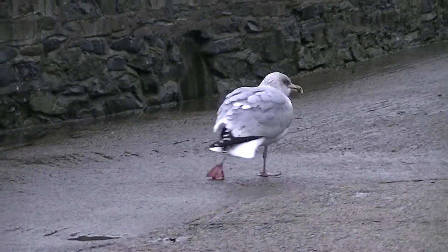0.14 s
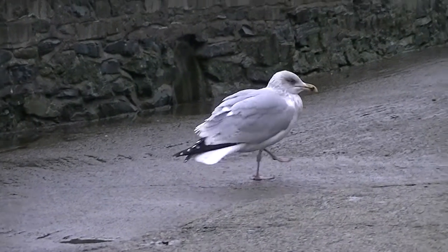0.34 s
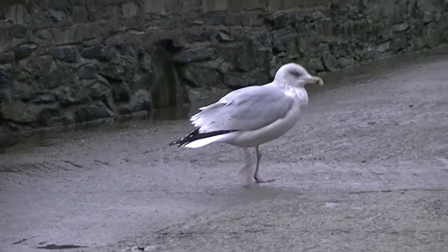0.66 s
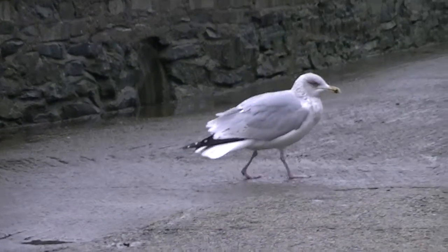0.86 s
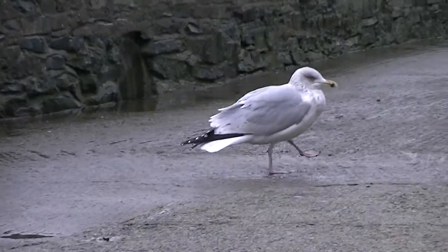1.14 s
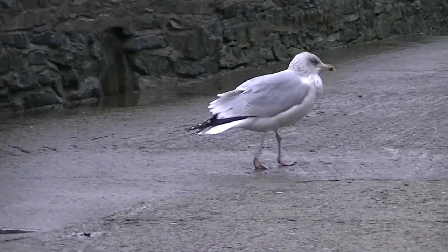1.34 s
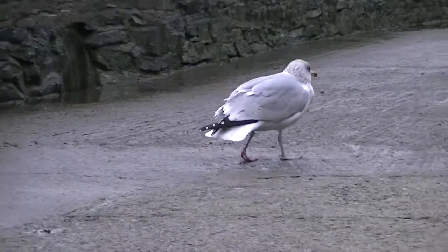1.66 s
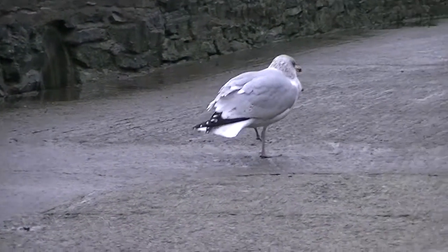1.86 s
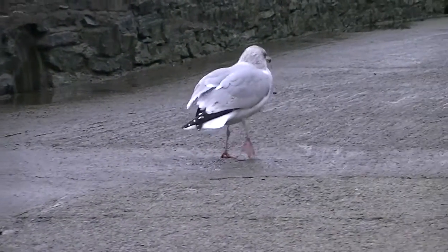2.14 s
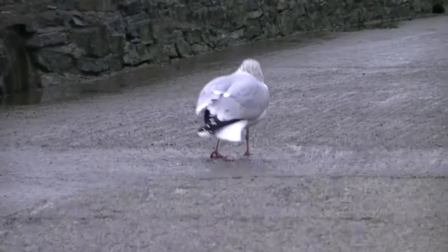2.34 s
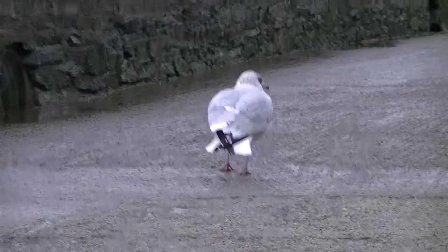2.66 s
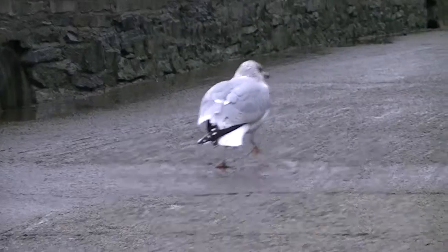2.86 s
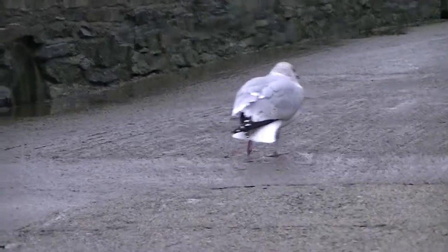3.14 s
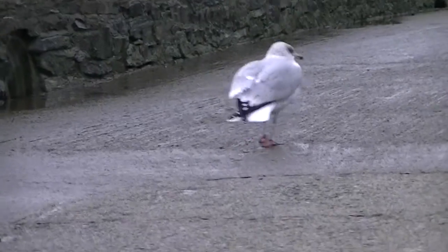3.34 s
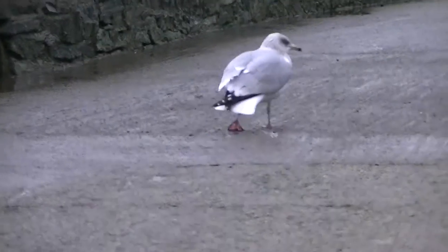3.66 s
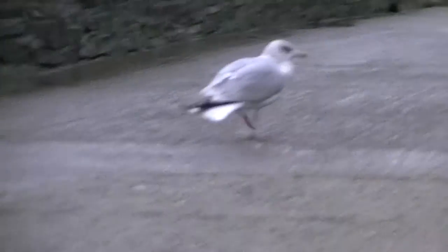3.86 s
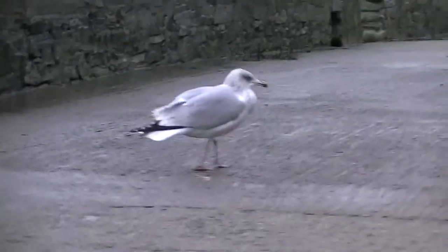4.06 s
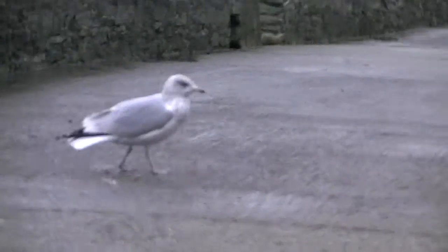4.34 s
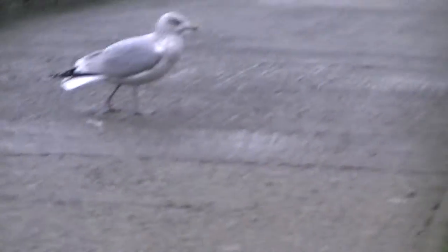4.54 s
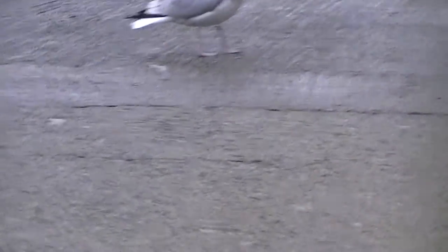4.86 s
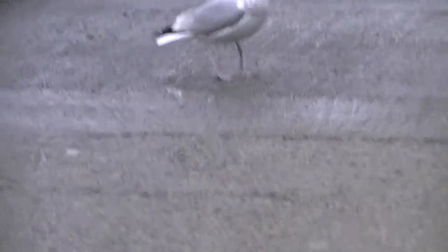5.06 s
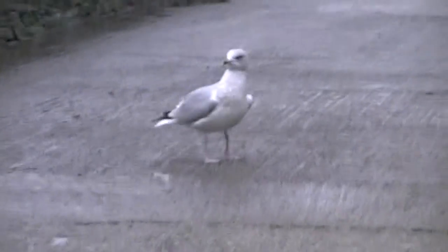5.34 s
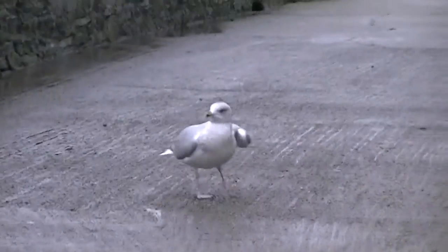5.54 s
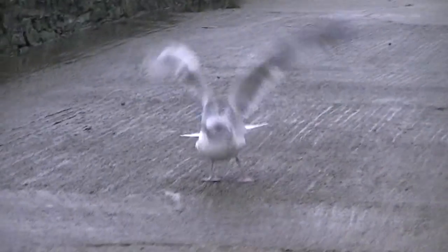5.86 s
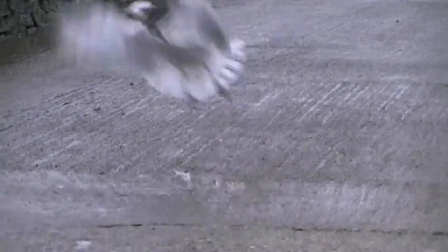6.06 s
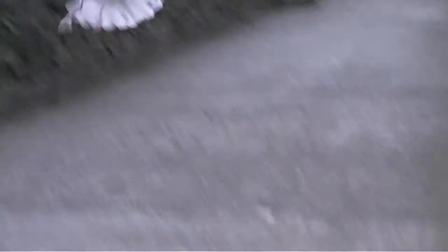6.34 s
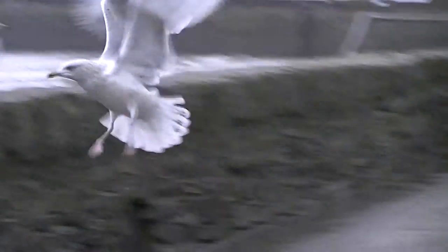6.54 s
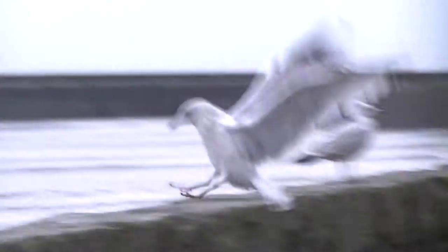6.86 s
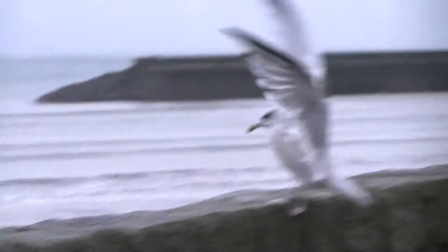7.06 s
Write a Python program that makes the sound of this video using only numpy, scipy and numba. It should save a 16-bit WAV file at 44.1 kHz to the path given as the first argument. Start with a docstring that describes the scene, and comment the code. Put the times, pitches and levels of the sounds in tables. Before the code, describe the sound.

Surf washes steadily at a harbour. Two hoarse seagull cries overlap at the start, and a louder one follows after a short pause. Later a wave rolls in with a hollow, tumbling roar as a fourth cry rings out. A single bubble plops, and a few faint ticks and distant bird peeps come through the water. The outdoor sound is nearly mono, with almost no echo.

```python
"""Harbour slipway: four hoarse gull cries, the first two overlapping, over steady surf.
A cry is a fast train of air bursts, each much like the last, ringing a throat that slides from
open to closing. Late on, a wave rolls in with a hollow roar and one large bubble; far peeps and
a few ticks are scattered about. A nearly mono microphone turns its gain down on loud sounds."""
import sys
import numpy as np
from scipy import signal
from scipy.fft import rfft, irfft
from scipy.io import wavfile
from scipy.ndimage import uniform_filter1d
from numba import njit

SR = 44100
rng = np.random.default_rng(int(sys.argv[2]) if len(sys.argv) > 2 else 0)


def output_pcm(signal):
    """Save a mono or channel-first signal as 16-bit PCM at the path in sys.argv[1].

    Samples are clipped to [-1, 1] before scaling.
    """
    pcm = np.clip(np.atleast_2d(signal).T, -1, 1) * 32767
    wavfile.write(sys.argv[1], SR, np.round(pcm).astype(np.int16))


N = 317520


def undb(db):
    return 10 ** (np.asarray(db) / 20)


def unit(x):
    return x / np.sqrt(np.mean(x ** 2))


def curve(table, t):
    """Table columns interpolated at times t."""
    times_s, *columns = np.transpose(table)
    return [np.interp(t, times_s, c) for c in columns]


def pan(x, db):
    """Mono to stereo; db is left minus right."""
    return np.array([x * undb(db / 2), x * undb(-db / 2)])


@njit
def svf(x, hz, width_hz):
    """State-variable band-pass, moving centre and width, gain 1 at the centre."""
    y, band, low = np.empty(len(x)), 0., 0.
    for i in range(len(x)):
        g, damping = np.tan(np.pi * hz[i] / SR), width_hz[i] / hz[i]
        v = (band + g * (x[i] - low)) / (1 + g * (g + damping))
        band, low, y[i] = 2 * v - band, low + 2 * g * v, damping * v
    return y


def bandpass(x, hz, width_hz):
    """Two band-passes in series."""
    hz, width_hz = hz + 0 * x, width_hz + 0 * x
    return svf(svf(x, hz, width_hz), hz, width_hz)


@njit
def repeating_noise(fresh, period_samples, carry):
    """Noise that recurs one period later, mixed with fresh noise."""
    y = fresh.copy()
    for i in range(len(y)):
        j = i - period_samples[i]
        if j >= 0:
            y[i] = carry * y[j] + np.sqrt(1 - carry * carry) * fresh[i]
    return y


def walk(rate_hz, count=N):
    """Random steps, smoothed twice; RMS 1."""
    hold = int(SR / rate_hz)
    steps = np.repeat(rng.standard_normal(count // hold + 1), hold)
    return unit(uniform_filter1d(uniform_filter1d(steps, hold), hold)[:count])


def coloured_noise(hz, db):
    """Noise with the given spectrum."""
    bins_hz = np.arange(1, N // 2 + 2) * SR / N
    gain = undb(np.interp(np.log(bins_hz), np.log(hz), db, right=-150))
    return irfft(rfft(rng.standard_normal(N)) * gain, N)


def stereo_noise(spectrum):
    """Common mid plus independent, mostly weaker side; RMS 1."""
    # stereo width: (frequency [Hz], side minus mid [dB])
    width = [(60, -5), (110, 2), (190, -23.5), (340, -24.5), (600, -29), (1060, -19), (1880, -17),
             (3330, -15.5), (5910, -13), (10500, -10.5)]
    width_hz, width_db = np.transpose(width)
    hz, db = np.transpose(spectrum)
    side_db = np.interp(np.log(hz), np.log(width_hz), width_db)
    mid, side = coloured_noise(hz, db), coloured_noise(hz, db + side_db)
    return unit(np.array([mid + side, mid - side]))


def surf():
    """Distant wash and spray, each swaying on its own, over faint microphone hiss."""
    # surf loudness: (time [s], wash [dB], spray [dB])
    levels = [(0, -34.5, -56), (1.2, -35, -50.5), (1.8, -36.5, -55.5), (2.3, -35.5, -53), (3.1, -35, -47),
              (3.6, -35, -45), (4.2, -34.5, -47), (4.7, -34, -45), (5.3, -31, -43), (6.1, -32.5, -42.5),
              (6.6, -32.5, -42.5), (7.2, -29.5, -41.5)]
    # wash noise: (frequency [Hz], relative density [dB])
    wash_spectrum = [(18, -86), (30, -43), (91, -58), (226, -13.5), (384, -9.5), (458, -4), (834, -1),
                     (974, 0.5), (1300, -2.5), (1660, -2), (2820, -12), (3090, -11.5), (3520, -17),
                     (6000, -32.5), (7800, -52), (13200, -120)]
    # spray noise: (frequency [Hz], relative density [dB])
    spray_spectrum = [(1470, -23), (2500, -1.5), (2660, -5), (2830, -2.5), (3050, -11), (3200, -3.5),
                      (5310, -9.5), (7510, -20.5), (10900, -39.5), (14200, -66), (22000, -120)]
    wash_db, spray_db = curve(levels, np.arange(N) / SR)
    sway_db = .3 * walk(3) + .5 * walk(14)
    hiss = undb(-82.5) * stereo_noise([(7000, -28), (10500, -3), (13000, -4), (16000, -28)])
    wash = stereo_noise(wash_spectrum) * undb(wash_db + sway_db)
    spray = stereo_noise(spray_spectrum) * undb(spray_db + .27 * walk(3.03))
    return wash + spray + hiss


def ticks():
    """Dry 2 ms clicks, dulled by distance."""
    # clicks: (time [s], level [dB], ring [Hz])
    clicks = [(2.318, -46, 5000), (3.243, -42, 6000), (4.219, -33, 7000), (5.390, -44, 5500),
              (6.329, -38, 6000), (6.419, -42, 6000), (6.488, -37, 4800), (6.905, -34, 4500),
              (6.946, -35, 5400), (6.9675, -20, 4300)]
    out, t = np.zeros(N), np.arange(300) / SR
    for start_s, db, hz in clicks:
        grit = rng.standard_normal(len(t)) * t * np.exp(-t / .0006)
        click = bandpass(grit, hz, width_hz=4500)
        start = int(start_s * SR)
        out[start:start + len(t)] += undb(db) * click / np.abs(click).max()
    return signal.sosfilt(signal.butter(4, 7500, fs=SR, output="sos"), out)


def glide(start_s, length_s, from_hz, to_hz, db, throb_db):
    """Short sliding tone with slight flutter."""
    out, start, count = np.zeros(N), int(start_s * SR), int(length_s * SR)
    hz = np.linspace(from_hz, to_hz, count) + 35 * walk(400, count)
    envelope = undb(db + throb_db * walk(150, count)) * np.sqrt(np.hanning(count))
    out[start:start + count] = envelope * np.sin(2 * np.pi * np.cumsum(hz) / SR)
    return out


def far_birds():
    """Distant peeps, one glide each."""
    # calls: (time [s], length [s], start [Hz], end [Hz], level [dB], throb [dB])
    peeps = [(3.535, .035, 3050, 3000, -40, 1), (6.762, .06, 2270, 2390, -25.5, 1.5),
             (6.975, .108, 2480, 1530, -34, 4)]
    return sum(glide(*peep) for peep in peeps)


def bubble():
    """One large bubble: a quick rising plop."""
    return glide(start_s=6.316, length_s=.011, from_hz=750, to_hz=1250, db=-14.5, throb_db=0)


def incoming_wave():
    """Tumbling water: lumpy noise in a hollow, broad-flanked resonance and an upper one, over a hum."""
    # swell, crest, drain: (time [s], level [dB], hollow resonance [Hz])
    swell = [(4.4, -47, 850), (5.0, -53, 850), (5.4, -30, 850), (5.75, -22, 990), (6.1, -26.5, 887),
             (6.4, -26.5, 884), (6.7, -29, 874), (7.2, -35.5, 910)]
    surges = [(6.07, 2.2), (6.25, 1.7), (6.5, 3.7), (6.61, 2)]  # (time [s], rise [dB])
    surge_sigma_s = .017
    t = np.arange(N) / SR
    db, hz = curve(swell, t)
    churn = stereo_noise([(120, -74), (260, 3), (4000, 1)]) * undb(1.5 * walk(90) + .8 * walk(25))

    def resonance(centre_hz, width_hz):
        return np.array([unit(bandpass(side, centre_hz, width_hz)) for side in churn])

    hollow = undb(-8) * resonance(hz, 380)
    flanks = undb(-4) * resonance(hz, 1230)
    upper = undb(-14.5) * resonance(1.53 * hz, 350)
    hum = undb(-23.5) * resonance(331, 86)
    fade_in = np.clip(t - swell[0][0], 0, 1)
    surge_db = sum(rise_db * np.exp(-.5 * ((t - at_s) / surge_sigma_s) ** 2) for at_s, rise_db in surges)
    tumble_db = .7 * walk(rate_hz=9)
    return (hollow + flanks + upper + hum) * undb(db + surge_db + tumble_db) * fade_in


def cry(contour, throat, mix, clarity):
    """Air bursts ring sliding throat resonances, part chirp, part breath, over a broad rasp."""
    short_burst_hz = 7500  # towards this, rings get shorter and hoarser
    span = np.arange(int(contour[0][0] * SR), int(contour[-1][0] * SR))
    count = len(span)
    burst_hz, db, upper_db, closing, lift = curve(contour, span / SR)
    pan_db, rasp_db = mix

    def morph(open_to_closing):
        return np.interp(closing, np.linspace(0, 1, len(open_to_closing)), open_to_closing)

    clear_low, clear_high = morph(clarity[:2]), morph(clarity[2:])
    burst_hz = burst_hz * (1 + .012 * walk(40, count))
    cycles = np.cumsum(burst_hz) / SR
    air = repeating_noise(rng.standard_normal(count), (SR / burst_hz).astype(np.int64), carry=.85)

    def bursts(lag_cycles, hz):
        """Burst envelope; a hoarse voice leaks air in between."""
        leak = .05 + .2 * (1 - clear_high) ** 2
        pulse = np.abs(np.sin(np.pi * ((cycles - lag_cycles) % 1) ** .8))
        return leak + pulse ** (.9 + (hz / short_burst_hz) ** 2)

    def ring(hz, width_hz, lag_cycles, clear):
        """One resonance; hoarseness adds a rise per burst, tremble and damping."""
        lag_cycles = lag_cycles + .035 * walk(30, count)
        clear = clear / (1 + (hz / short_burst_hz) ** 6)
        envelope = bursts(lag_cycles, hz)
        rise_hz = 460 * ((cycles - lag_cycles) % 1 - .43)
        tremble_hz = (60 + 90 * (hz / short_burst_hz) ** 4) * walk(150, count)
        hz = hz + (1 - clear) * (rise_hz + tremble_hz)
        chirp = envelope * undb(.77 * walk(90.3, count)) * np.sin(2 * np.pi * np.cumsum(hz) / SR)
        breath = bandpass(air * envelope, hz, width_hz * (1.6 - clear))
        chirp_share = clear ** .55
        return np.sqrt(chirp_share) * unit(chirp) + np.sqrt(1 - chirp_share) * unit(breath)

    rings = []
    for k, mode in enumerate(throat):
        gain = undb(morph(mode[1::2]) + .8 * walk(20, count))
        hz = morph(mode[::2]) * (1 + .0102 * lift)
        clear = clear_low if k < 2 else clear_high
        # higher resonances: broader, struck later
        rings.append(gain * ring(hz, width_hz=290 + .03 * mode[0], lag_cycles=.041 * k, clear=clear))
    rasp = unit(bandpass(air * bursts(.043, 3900), 4200, 1800))
    edge = clear_high * unit(bandpass(air * bursts(.23, 9150), 9270, 2100))
    upper = sum(rings[2:]) + undb(rasp_db) * (rasp + undb(2.5) * edge)
    voice = undb(db) * (sum(rings[:2]) + undb(upper_db) * upper) * signal.windows.tukey(count, .03)
    out = np.zeros((2, N))
    out[:, span] = pan(voice, pan_db)
    return out


def gulls():
    """Four cries with a short bright scatter off wall and wet ground."""
    # course of each cry: (time [s], burst rate [Hz], level [dB], upper resonances and rasp [dB],
    # throat closing [0-1], lift of all resonances [1.02 %])
    contours = [
        [(.095, 88, -57, -3, 0, 0.1), (.118, 89, -31, 2.5, 0.02, 0.074), (.2, 91.4, -30.5, 3.5, 0.36, 0),
         (.29, 90.5, -29, -3.5, 0.51, 0.058), (.33, 90.2, -31, -2.5, 0.64, 0.11),
         (.42, 92, -31, -1.5, 0.94, 0.088), (.49, 87, -30.5, -3, 0.93, 0.91), (.57, 76, -49, 5, 0.99, 1.8)],
        [(.40, 85, -40, -2, 0, 0.5), (.44, 84, -31, -8, 0.02, 1), (.51, 81.5, -27.5, -2, 0.02, 0),
         (.55, 80.7, -27, -0.5, 0.29, -1.5), (.64, 80.3, -27.5, 2, .36, 0), (.75, 76.5, -30, 2.5, 0.68, 0),
         (.8, 78, -36, 1.5, .9, -4), (.86, 73, -35.5, 4.5, 0.88, 0), (.97, 72.9, -42, 3, 0.94, -3.5),
         (1.06, 69, -61, 0, 0.93, -4)],
        [(2.44, 96, -30, -17, 0.01, -1.7), (2.455, 88, -32, -14, 0.03, 0), (2.461, 88.8, -19.5, -1.5, 0, 0),
         (2.5, 88.5, -19, 0.5, 0.07, 0.2), (2.6, 87.5, -20, 0, .33, -0.5), (2.69, 85, -19.5, -1.5, 0.56, 0.5),
         (2.77, 81, -23, -0.5, 0.65, -0.05), (2.83, 77, -25, 1, 0.87, -0.8), (2.87, 83, -29.5, 0.5, 1, 0.081),
         (2.915, 73, -32.5, -8, 1, -1.5), (2.94, 94, -46, -10, 1, -2)],
        [(5.465, 88, -35, -21, 0, 4), (5.49, 89, -26, -8, 0.05, 3), (5.508, 90, -19.5, 0.5, 0.01, -1.5),
         (5.58, 88, -19, -1, 0.13, 0.5), (5.65, 85.5, -19, -1, 0.3, 0), (5.71, 83.5, -22, 1, 0.62, -0.5),
         (5.79, 83, -25.5, 3.5, 0.96, 0.5), (5.87, 81.5, -26, 2, 0.98, -1), (5.92, 80, -29.5, 3, 0.98, -2),
         (5.97, 74, -36, 0, 1, -5), (6.05, 94, -49.5, 0, 0.97, -8.5)],
    ]
    # throat of each cry, a row per resonance: (frequency [Hz], level [dB]) x 4, open to closing
    throats = [
        [(1560, 4, 1500, 3, 1500, -1, 1560, -4), (2180, -6, 2310, -4, 2330, -5, 2500, -6),
         (3100, -15, 3070, -17, 3050, -12, 3300, -9), (3700, -20, 3740, -11, 3600, -13, 3850, -6),
         (4050, -16, 4100, -19, 4150, -8, 4250, -8), (4600, -25, 4590, -17, 4600, -16, 4600, -14),
         (5020, -23, 4980, -13, 5000, -8, 5000, -8), (5580, -23, 5550, -18, 5700, -25, 5840, -18),
         (7150, -34, 7150, -24, 6650, -22, 6830, -16)],
        [(1454, -12, 1454, -14, 1450, -10, 1550, -1), (1900, -10, 1830, 0, 1770, 0, 1650, -5),
         (2500, -10, 2710, -11, 2620, -11, 2620, -16), (3300, -16, 3100, -25, 3100, -22, 3150, -14),
         (3700, -16, 3700, -18, 3950, -17, 3890, -13), (4350, -6, 4360, -12, 4400, -14, 4300, -14),
         (5400, -24, 5500, -15, 5650, -21, 5220, -18), (6100, -26, 6220, -19, 6550, -27, 5930, -25),
         (7750, -36, 7900, -36, 7400, -35, 7600, -36)],
        [(1540, -2, 1590, -2, 1430, -2, 1270, 0), (2260, 3, 2180, -2, 1960, 0, 1760, -2),
         (2800, -14, 2780, -11, 2780, -3, 2690, -3), (3250, -18, 3250, -18, 3240, -2, 3150, -8),
         (3650, -6, 3800, -16, 3780, -14, 3860, -7), (4200, -9, 4220, -4, 4200, -14, 4100, -18),
         (4600, -6, 4750, -7, 4760, -1, 4430, -6), (5210, -2, 5190, -3, 5200, -3, 4850, -13),
         (5700, -9, 5780, -5, 5600, -14, 5400, -9), (6780, -21, 6700, -22, 6850, -14, 6400, -22),
         (7670, -17, 7950, -12, 7200, -12, 7100, -28), (9400, -28, 9850, -24, 9400, -28, 9000, -34)],
        [(1300, -1, 1300, -3, 1510, 0, 1380, -5), (1870, -2, 1880, 0, 1930, -9, 1970, 0),
         (2330, -10, 2350, -15, 2400, -16, 2500, -20), (3210, -16, 3200, -20, 3290, -15, 3250, -19),
         (3800, -13, 3800, -13, 3900, -16, 3850, -18), (4400, -13, 4400, -12, 4330, -15, 4550, -13),
         (4800, -13, 4920, -12, 4850, -12, 4850, -18), (5250, -12, 5300, -16, 5150, -19, 5150, -22),
         (5750, -19, 5750, -20, 5700, -25, 5650, -28), (6900, -29, 6900, -30, 7000, -27, 6800, -27),
         (7600, -27, 7550, -28, 7600, -31, 7600, -38)],
    ]
    # balance of each cry: (left minus right [dB], rasp [dB])
    mixes = [(2, -37), (2.5, -30), (1.5, -29), (0.8, -42)]
    # resonance clarity of each cry [0-1]: (lowest two open, closing, upper ones open, closing)
    clarities = [(.17, .12, .17, .15), (.85, .3, .5, 0), (.37, .5, .4, .48), (.27, .45, .07, .12)]
    cries = sum(cry(*bird) for bird in zip(contours, throats, mixes, clarities))
    # small throat: no bass; distance: no top
    direct = signal.sosfilt(signal.butter(5, [850, 10300], "band", fs=SR, output="sos"), cries)
    rt60_s = .015
    fade = np.exp(-np.arange(4000) / SR * np.log(1000) / rt60_s)
    bright_noise = signal.lfilter([1, -.6], 1, rng.standard_normal((2, 4000)))
    scatter = bright_noise * fade / np.sqrt(np.sum(fade ** 2))
    return direct + undb(-11) * signal.fftconvolve(direct, scatter, axes=1)[:, :N]


def scene():
    """All sources; the sea drifts slightly left, then right."""
    # sea balance: (time [s], left minus right [dB])
    drift = [(0, -0.1), (4.5, 0.3), (6.3, -.5)]
    sea_pan_db, = curve(drift, np.arange(N) / SR)
    sea = (surf() + incoming_wave()) * pan(np.ones(N), sea_pan_db)
    return gulls() + sea + far_birds() + bubble() + ticks()


def record(dry):
    """Microphone: gain control on 50 ms loudness, no deep bass, steep treble cut."""
    threshold_db, cut_db_per_db, low_hz, top_hz = -27, .3, 140, 15700
    power = uniform_filter1d(np.mean(dry ** 2, axis=0), 2200)
    over_db = np.maximum(10 * np.log10(power + 1e-12) - threshold_db, 0)
    held = dry * undb(-cut_db_per_db * over_db)
    thinned = signal.sosfilt(signal.butter(2, low_hz, "high", fs=SR, output="sos"), held)
    return signal.sosfilt(signal.ellip(8, .2, 70, top_hz, fs=SR, output="sos"), thinned)


dry = scene()
out = record(dry)
output_pcm(out)
```